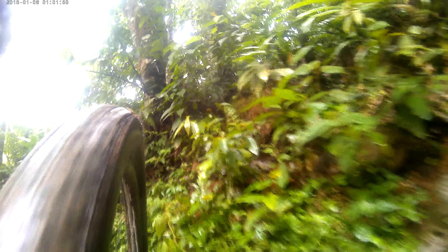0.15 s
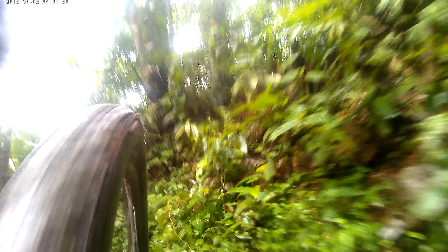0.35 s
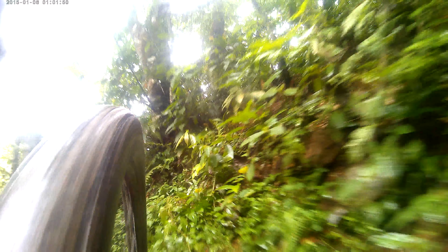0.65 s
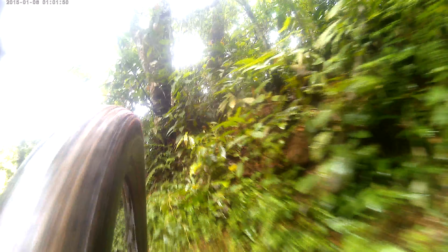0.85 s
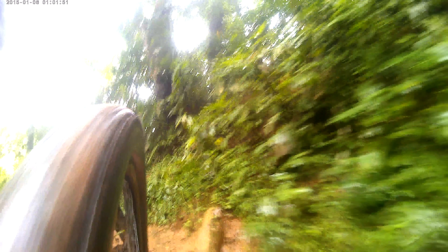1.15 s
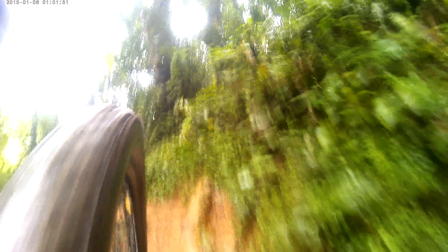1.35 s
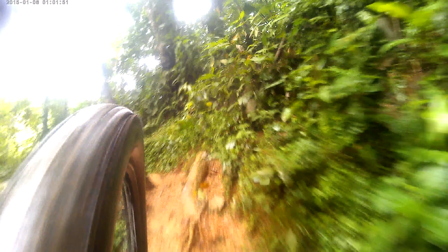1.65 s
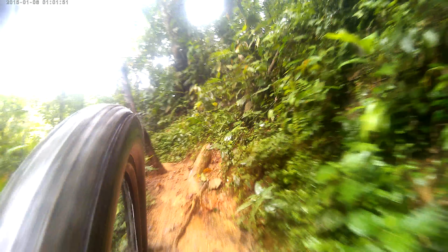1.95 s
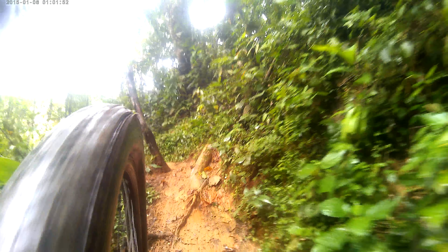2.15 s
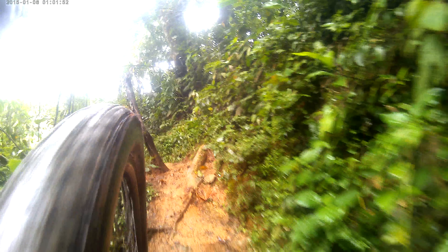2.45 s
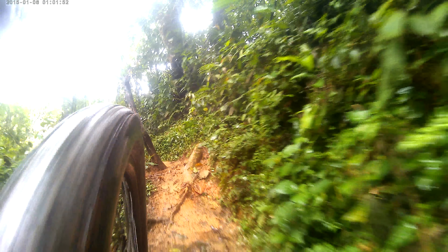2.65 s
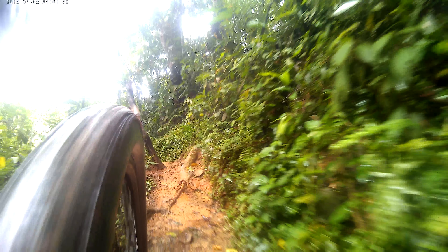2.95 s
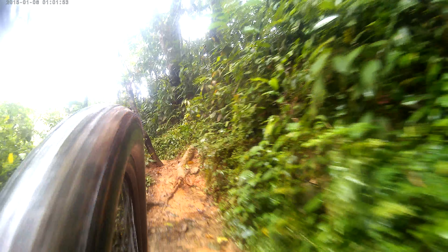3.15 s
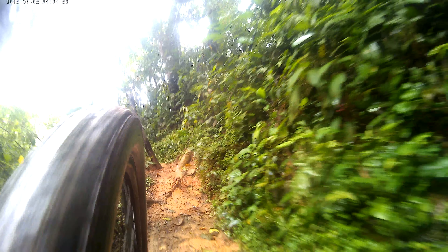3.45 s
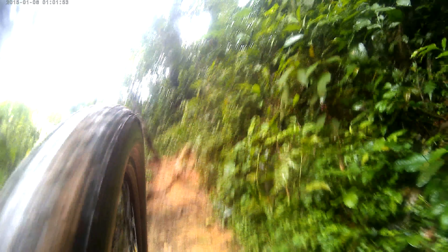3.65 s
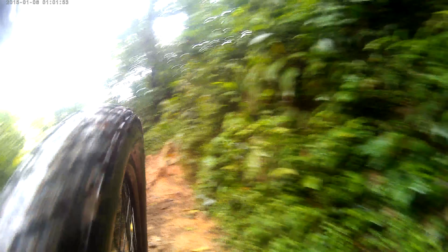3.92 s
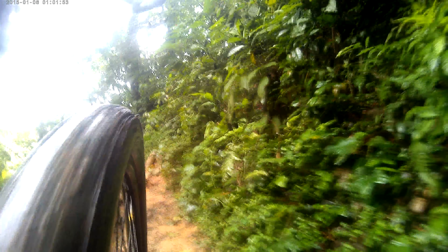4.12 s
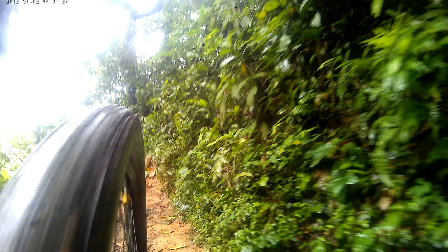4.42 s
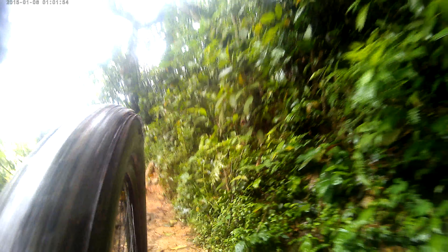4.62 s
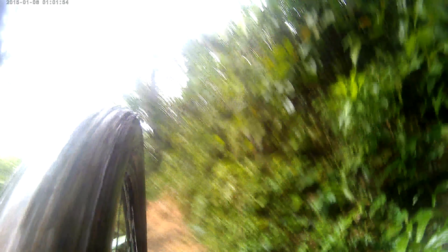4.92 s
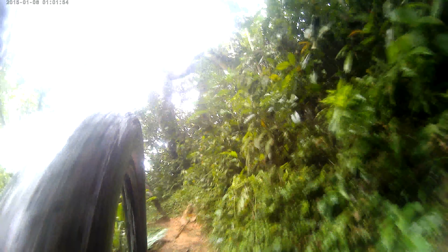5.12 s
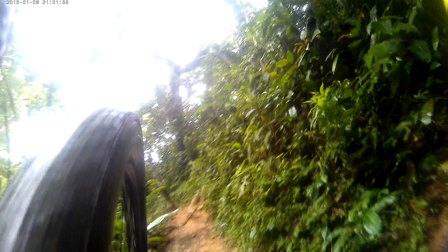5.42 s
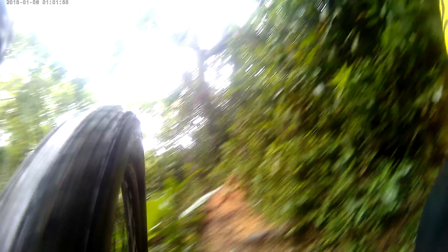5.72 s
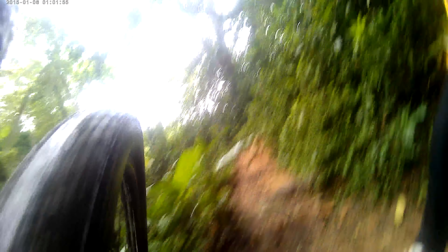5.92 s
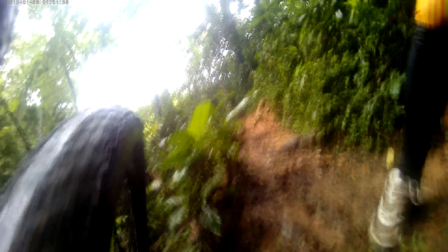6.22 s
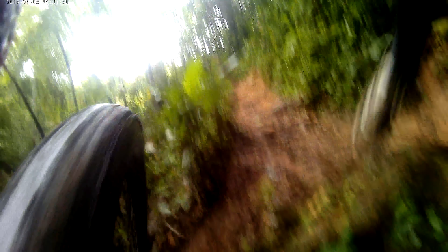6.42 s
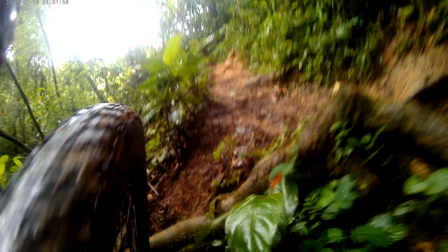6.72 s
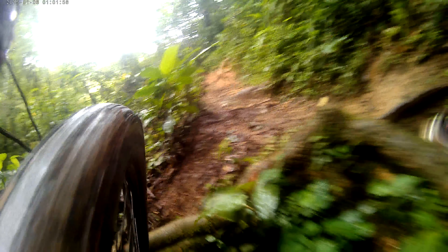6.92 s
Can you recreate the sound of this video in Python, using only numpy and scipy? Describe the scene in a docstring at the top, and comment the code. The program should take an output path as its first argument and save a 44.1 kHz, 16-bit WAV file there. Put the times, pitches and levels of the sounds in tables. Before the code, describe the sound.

A bicycle shakes along a muddy forest trail, captured through its plastic housing at no distance. Dull trembling and hollow ticks run unevenly, with a stronger rattle before a short drag and a calmer moment. Two hard bump clusters bring clattering blows and a low, fading tyre boom; the last second has heavy, clipped knocks, then eases. Treble is missing and there is no room echo.

```python
"""A mountain bike on a rough mud trail, from a microphone sealed in a plastic housing clamped to the frame.
From the start the trail shakes housing and mount through filtered noise and jolts, small parts rattle, a panel
whirrs, and loose parts tick and knock at no distance. At 2.4 s something drags along the housing. Near 3.15 s and
5.8 s come hard patches with hammering blows of the clamp and a decaying sine boom from the tyre. More rough
patches and heavy knocks follow to the end; the hardest blows overload the narrow-band capture."""
import sys
import numpy as np
from scipy import signal
from scipy.io import wavfile
from scipy.ndimage import uniform_filter1d

SR = 44100
rng = np.random.default_rng(int(sys.argv[2]) if len(sys.argv) > 2 else 0)


def wav_out(sig):
    """Save sig, one row per channel (or a flat mono array), as 16-bit PCM at SR to the path in sys.argv[1]."""
    wavfile.write(sys.argv[1], SR, np.round(np.clip(np.atleast_2d(sig).T, -1, 1) * 32767).astype(np.int16))


N = 311787

# even stretches of the trail, joined by straight lines: start_s, shaking_db (housing), heave_db (mount, above shaking)
TRAIL_STRETCHES = [(0, -36.5, 5.5), (0.41, -41, 5.5), (0.8, -38, -0.5), (1.3, -42.5, -1), (1.55, -38.5, -5),
                   (1.74, -25.5, -1), (1.9, -27, 6.5), (2.33, -36, -11), (2.6, -33, -20), (3.1, -38, -8.5),
                   (3.65, -36.5, -16.5), (4.0, -37.5, -1), (4.87, -42.5, -0.5), (5.18, -52, -1.5),
                   (5.35, -39, 3), (6.28, -36.5, -13.5), (7.07, -44.5, 5)]
# rough patches under the wheel: start_s, length_s, shaking_db, heave_db (above shaking)
ROUGH_PATCHES = [(0.888, 0.072, -23, 3), (1.586, 0.04, -23, -10), (1.905, 0.011, -19, 12),
                 (3.119, 0.015, -23.5, -7.5), (3.15, 0.058, -5, -5.5), (3.274, 0.074, -19, -6.5),
                 (4.042, 0.13, -20.5, 3.5), (4.247, 0.032, -13.5, -5), (4.434, 0.025, -25, -6),
                 (4.463, 0.11, -17, -7.5), (4.612, 0.12, -25.5, 1), (5.386, 0.032, -25.5, 8.5),
                 (5.443, 0.17, -17.5, -6), (5.568, 0.12, -14.5, -5), (5.723, 0.028, -5.5, -15),
                 (5.773, 0.022, -8, -15.5), (5.828, 0.027, -4.5, -13), (5.964, 0.048, -22.5, -6.5),
                 (6.374, 0.088, -27, 3), (6.563, 0.096, -12, -10.5), (6.708, 0.016, -20, -9),
                 (6.749, 0.0072, -9.5, 2), (6.802, 0.026, -16.5, -6), (6.912, 0.013, -11.5, -6),
                 (7.046, 0.03, -19.5, -1)]
# each patch builds up before its start, holds, drops away fast, and leaves the frame to settle
BUILD_DB_PER_S, DROP_DB_PER_S, SETTLE_DB, SETTLE_DB_PER_S = 2002, 397.5, -15.5, 75
# modes of the housing walls: pitch_hz, width_hz, level_db
WALL_MODES = [(309.3, 87.4, 3.5), (363.6, 77, 1), (429.3, 97.5, -0.5), (506, 81, -6), (602, 64, -5.5),
              (758.3, 69, -6), (908, 62.4, -9), (984, 65, -14)]
# modes of the small stiff parts of the housing: pitch_hz, width_hz, level_db
PART_MODES = [(1520, 410, -4), (1449, 71, -0.5), (1540, 133, 8), (1748, 530, -1), (2000, 44, 0),
              (2250, 160, -14), (2767, 130, -14.5), (3108, 120, -8), (3600, 330, -23)]
# modes of the mount on the frame: pitch_hz, width_hz, level_db
MOUNT_MODES = [(27, 43, -6), (78, 30, -3), (133, 45, -4)]
# modes of the flexing clamp: pitch_hz, width_hz, level_db
CLAMP_MODES = [(159, 44.6, 0.5), (268, 185, 2)]
# loose parts striking the housing: start_s, tick_db, knock_db (above the tick), knock_pitch_hz
LOOSE_STRIKES = [(0.103, -27, 1.5, 296), (0.198, -31.5, 12, 370), (0.2301, -32, 4, 353),
                 (0.392, -29, 4.5, 243), (0.4909, -29.5, 15.5, 377), (0.586, -29, 3, 403),
                 (0.7058, -31.5, -11, 332), (0.7425, -31, 10, 364), (0.8838, -43, 33.5, 371),
                 (0.9175, -27, 21.5, 800), (0.934, -24.5, -7, 400), (0.946, -32, 21, 300),
                 (1.0622, -26, -17, 358), (1.1139, -29, 10, 412), (1.192, -29, -17, 396),
                 (1.268, -32, 15, 400), (1.395, -32.5, 17.5, 405), (1.5051, -31, 8, 413),
                 (1.597, -29.5, 6, 334), (1.6068, -29, 11.5, 600), (1.664, -30, -8, 400),
                 (1.705, -28.5, -1, 400), (1.726, -32, 19, 296), (1.8115, -28.5, 15, 293),
                 (1.8575, -30, 14.5, 603), (1.874, -24, 3, 400), (1.908, -18.5, 20.5, 253),
                 (1.921, -15.5, 8.5, 800), (2.2152, -31.5, 3.5, 360), (2.3329, -30, 3, 440),
                 (2.6574, -33, 8, 365), (2.9303, -34.5, 10, 717), (3.148, -18.5, 15, 308),
                 (3.159, -13, -0.5, 400), (3.184, -5.5, 6, 810), (3.197, -7.5, -1.5, 350),
                 (3.448, -29.5, -11, 342), (3.4864, -22.5, 8, 497), (3.6097, -31.5, 11.5, 396),
                 (3.6875, -41.5, 26, 480), (3.7743, -28, 4.5, 400), (3.962, -29, 5, 339),
                 (4.0429, -34.5, 26, 377), (4.087, -25.5, 17.5, 402), (4.147, -38, 3, 400),
                 (4.1755, -27.5, 21, 563), (4.252, -23.5, 22, 624), (4.4637, -32.5, 19, 500),
                 (4.501, -28.5, 21.5, 258), (4.633, -30, 1, 590), (4.6466, -35.5, 29.5, 350),
                 (5.0081, -33.5, 6.5, 712), (5.3114, -32.5, 6.5, 334), (5.381, -41, 18.5, 510),
                 (5.436, -38, 25.5, 600), (5.4907, -32.5, 22, 689), (5.5665, -14, 18, 300),
                 (5.7187, -29, 21, 343), (5.864, -7.5, 5, 493), (5.966, -40.5, 31.5, 390),
                 (6.108, -31.5, 4, 355), (6.2794, -29.5, -23, 338), (6.444, -26, 5.5, 310),
                 (6.536, -27.5, 4, 239), (6.5604, -17, -10, 420), (6.6439, -30, 2, 427),
                 (6.7043, -21, 7, 337), (6.7525, -1, 8, 506), (6.876, -19.5, -1, 384),
                 (6.911, -19.5, 23.5, 297), (7.0513, -25, 11, 552)]
# the wheel meeting roots and stones: start_s, level_db, heave_pitch_hz
WHEEL_BUMPS = [(0.383, -7, 26.6), (0.871, -6, 27.8), (1.653, 1.5, 60), (3.143, -5.5, 128), (4.034, -1, 80),
               (5.513, -0.5, 27.4), (5.817, -12.5, 142), (6.542, 2, 140), (6.722, 3, 159)]
# landings that leave the air in the tyre booming: start_s, level_db (before onset and wobble)
TYRE_BOOMS = [(3.163, -6.5), (5.822, -3)]
TYRE_HZ, TYRE_T60_S = 127.2, 0.6  # air mode of the tyre
# the clamp hammering against its stop: start_s, length_s, walls_db, parts_db (small parts, above the walls)
CLAMP_HAMMERING = [(3.152, 0.048, -15.5, -13.5), (4.083, 0.057, -32, -8.5), (4.494, 0.058, -35.5, -22),
                   (5.768, 0.017, -18.5, -13.5), (5.83, 0.039, -13, -18)]
SCRAPE_S, SCRAPE_DB, SCRAPE_FADE_DB_PER_S = 2.401, -12, 249  # something drags along the housing
# modes the drag sets ringing: pitch_hz, width_hz (of each of two passes), level_db
DRAG_MODES = [(304, 22.5, -1), (758, 140, -10), (1590, 110, -5.5), (2970, 660, -20)]
# the rolling wheel: start_s, rattle_db (small parts), whirr_db (one panel), whirr_pitch_hz
WHEEL_ROLLING = [(0, -50.5, -32, 354), (.7, -45, -42, 374), (1.3, -50.5, -33, 390),
                 (1.7, -49.5, -36, 391.5), (2.9, -47.5, -74.5, 331), (3.4, -48.5, -27.5, 378),
                 (3.9, -59, -45, 399), (4.5, -51, -26.5, 344), (5.2, -60, -52.5, 360),
                 (5.7, -47.5, -31, 331), (6.25, -53, -33.5, 336), (6.75, -32.5, -38, 375),
                 (7.07, -79, -46, 350)]
BAND_HZ, EDGE_HZ = 4230, 19700  # band limits of the capture, before and after the flat cut


def ride():
    """The rough trail shakes walls and mount, more weakly the small parts, and flexes the clamp."""
    shake_db, heave_db, contact_db = roughness()
    shared = jolts(per_s=300, spread_db=5.5, hum=0.93)
    mount_force = soft(jolts(per_s=60, spread_db=-2.5, hum=0.91), 240.0)
    mount = trembling(mount_force, MOUNT_MODES, patchy_db=9.0)
    parts = trembling(soft(shared, 2500.0), PART_MODES[:6], patchy_db=4.0)
    walls = soft(trembling(soft(shared, 1100.0), WALL_MODES, patchy_db=4.5), 1400.0)
    clamp = trembling(soft(shared, 750.0), CLAMP_MODES, patchy_db=0.0)

    thud = jolts(per_s=150, spread_db=3.0, hum=0.9)  # reaches the housing through the tubes without ringing
    for hz in (598.0, 900.0, 1100.0):
        thud = soft(thud, hz)
    frame = steady(thud, 0.09)

    flex_db = np.minimum(0.2 * shake_db + 0.5, -3.0)  # the clamp gives more under hard shaking
    lumps_db = 2.98 * wander(35)  # stones and ruts come unevenly
    shaken = walls + gain_of(heave_db) * mount + gain_of(flex_db) * clamp
    shaken += gain_of(contact_db - shake_db - 23.5) * parts + gain_of(-5.5) * frame
    return gain_of(shake_db + lumps_db) * shaken


def roughness():
    """Trail and patches add as powers: shaking dB, heave dB above it, and contact dB, which does not settle."""
    shake_db, heave_db = curves(TRAIL_STRETCHES)
    power = gain_of(2 * np.array([shake_db, shake_db + heave_db, shake_db]))
    t = np.arange(N) / SR
    for s, length, db, above_db in ROUGH_PATCHES:
        early, late = np.maximum(s - t, 0), np.maximum(t - s - length, 0)
        drop_db = -DROP_DB_PER_S * late
        fall_db = np.maximum(drop_db, SETTLE_DB - SETTLE_DB_PER_S * late)
        levels_db = np.array([db + fall_db, db + above_db + fall_db, db + drop_db])
        power += gain_of(2 * (levels_db - BUILD_DB_PER_S * early))
    shake_db, mount_db, contact_db = 10 * np.log10(power)
    return shake_db, mount_db - shake_db, contact_db


def strikes():
    """Each strike rings the small parts briefly and one wall panel a little longer, in a new balance of modes."""
    out = np.zeros(N)
    for s, tick_db, knock_db, hz in LOOSE_STRIKES:
        force = burst(0.0062)
        tick = body(force, PART_MODES, 2.5 * rng.standard_normal(len(PART_MODES)))
        click = gain_of(-15.5) * ring(force, 3000, 1100)  # the bare contact
        tick = tick / abs(tick).max() + click

        width = 46.0 + 280.0 * min(gain_of(tick_db + knock_db), 1)  # hard knocks press the panel and damp it
        push = force * (np.arange(len(force)) < SR // 500)  # the first 2 ms
        panel = ring(ring(push, hz, width), hz, width)  # two passes: swells for a few cycles, then fades
        walls = body(force, WALL_MODES, 5.4 * rng.standard_normal(len(WALL_MODES)))
        knock = soft(panel + 0.23 * walls, 2700.0)
        knock -= soft(knock, 110.0)  # the knock keeps little below about 110 Hz, so it does not thump

        strike = tick / abs(tick).max() + gain_of(knock_db) * knock / abs(knock).max()
        add(out, s, gain_of(tick_db) * strike)
    return out


def burst(decay_s):
    """The contact force of one strike: a sharp first touch, then chatter that dies away."""
    t = np.arange(SR // 10) / SR
    force = rng.standard_normal(len(t)) * np.exp(-t / decay_s)
    force[0] = 12.3
    return force


def bumps():
    """A bump throws the mount through a heavily damped cycle or so; two landings make the tyre boom."""
    out, t = np.zeros(N), np.arange(SR) / SR
    for s, db, hz in WHEEL_BUMPS:
        heave = np.sin(2 * np.pi * hz * t) * np.exp(-hz * t / 0.22)
        add(out, s, gain_of(db) * heave)

    wobble = 0.5 * np.sin(2 * np.pi * 13.0 * t)  # the turning wheel rocks the mode in phase and level
    fade = gain_of(-60 * t / TYRE_T60_S)
    onset = 1 - np.exp(-t / 0.0059)
    boom = np.sin(2 * np.pi * TYRE_HZ * t + wobble) * (1 + wobble) * fade * onset
    for s, db in TYRE_BOOMS:
        add(out, s, gain_of(db) * boom)
    return out


def hammering():
    """The clamp hits its stop in a dense volley of blows that starts at once, holds, and rings out."""
    out, t = np.zeros(N), np.arange(SR // 5) / SR
    for s, length, walls_db, parts_db in CLAMP_HAMMERING:
        volley = np.exp(-np.maximum(t - length, 0) / 0.0067)
        size = gain_of(5.5 * np.minimum(rng.exponential(1, len(t)), 4))
        blows = size * (rng.random(len(t)) < 400 / SR)  # 400 a second on average
        force = rng.standard_normal(len(t)) * (0.57 + blows) * volley
        walls = body(force, WALL_MODES, 2.0 * rng.standard_normal(len(WALL_MODES)))
        parts = body(force, PART_MODES[:6], 2.0 * rng.standard_normal(6))
        held = np.sqrt(len(t) / (volley ** 2).sum())  # refers the rms to the volley alone
        add(out, s, gain_of(walls_db) * held * (evened(walls) + gain_of(parts_db) * evened(parts)))
    return out


def scrape():
    """A short drag bites in and fades while its noise force keeps a few modes singing."""
    out, t = np.zeros(N), np.arange(SR // 5) / SR
    force = rng.standard_normal(len(t))
    sing = np.zeros(len(t))
    for hz, width, db in DRAG_MODES:
        mode = ring(ring(force, hz, width), hz, width)
        sing += gain_of(db) * steady(mode, 0.029)
    bite = np.minimum(t / 0.0096, 1)
    fade = gain_of(SCRAPE_DB - SCRAPE_FADE_DB_PER_S * t)
    add(out, SCRAPE_S, fade * bite * sing[::-1])  # the ringing runs backwards in time
    return out


def rolling():
    """Tread and mud keep the small parts rattling and one panel whirring at a pitch that wavers."""
    rattle_db, whirr_db, hz = curves(WHEEL_ROLLING)
    parts = trembling(jolts(per_s=79, spread_db=3.5, hum=1.2), PART_MODES, patchy_db=5.0)

    # a resonance of moving pitch: shift the force down to 0 Hz, smooth it, shift it back
    turn = np.exp(2j * np.pi * np.cumsum(hz + 12.0 * wander(15)) / SR)
    keep = np.exp(-np.pi * 42.0 / SR)  # each of two poles is 42 Hz wide
    force = jolts(per_s=13, spread_db=1.0, hum=0.88)
    whirr = (turn * signal.lfilter([1], [1, -2 * keep, keep ** 2], force / turn)).real

    clumps_db = 1.6 * wander(5.4)  # mud comes in lumps
    return gain_of(clumps_db) * (gain_of(rattle_db) * parts + gain_of(whirr_db) * steady(whirr, 0.58))


def trembling(force, modes, patchy_db):
    """Modes under a lasting force whose point of contact keeps moving, so the colour drifts."""
    weights_db = [patchy_db * wander(14) for mode in modes]
    return steady(body(force, modes, weights_db), 0.15)


def body(x, modes, weights_db):
    """A sum of modes, neighbours of opposite sign, each excited more or less strongly."""
    out = 0
    for k, (hz, width, db) in enumerate(modes):
        out = out + (-1) ** k * gain_of(db + weights_db[k]) * ring(x, hz, width)
    return out


def ring(x, hz, width):
    """One damped mode, a pole pair with a gain of about 1 at its centre."""
    pole = np.exp((2j * np.pi * hz - np.pi * abs(width)) / SR)
    return 2 * (1 - abs(pole)) * signal.lfilter([1], [1, -pole], x).imag


def jolts(per_s, spread_db, hum):
    """Random impacts, a few much larger (smaller if the spread is negative), over an even noise tremble."""
    size = gain_of(spread_db * np.minimum(rng.exponential(1, N), 4)) * rng.choice([-1., 1.], N)
    impacts = size * (rng.random(N) < per_s / SR)
    return evened(impacts) + hum * rng.standard_normal(N)


def soft(x, hz):
    """Rubber and plastic round off the contact: little force is left above hz."""
    return signal.lfilter(*signal.butter(2, hz, fs=SR), x)


def steady(x, window_s):
    """Divides out slow drift so that the level is set elsewhere."""
    return x / np.sqrt(uniform_filter1d(x ** 2, int(window_s * SR)) + 1e-12)


def wander(per_s):
    """A slow random curve of rms 1, through per_s chance points a second."""
    points = rng.standard_normal(int(N / SR * per_s) + 2)
    return evened(np.interp(np.arange(N) / SR * per_s, np.arange(len(points)), points))


def curves(rows):
    """Table columns as curves over time."""
    s, *columns = np.transpose(rows)
    return [np.interp(np.arange(N) / SR, s, c) for c in columns]


def gain_of(db):
    """Level in dB to amplitude."""
    return 10 ** (np.asarray(db) / 20)


def evened(x):
    """Scales to rms 1."""
    return x / np.sqrt(np.mean(x ** 2) + 1e-20)


def add(mix, s, sound):
    """Mixes a sound in at time s."""
    part = mix[round(s * SR):][:len(sound)]
    part += sound[:len(part)]


def low_pass(x, hz):
    """Steep band limit."""
    taps = signal.firwin(401, hz, window=("kaiser", 10), fs=SR)
    return signal.oaconvolve(x, taps[None], "same")


def scene():
    """Everything reaches one microphone through the housing."""
    return (ride() + rolling() + strikes() + hammering() + scrape() + bumps())[None]


def record(dry):
    """The microphone amplifier saturates; after the narrow-band capture, peaks past full scale are cut flat."""
    coupled = signal.lfilter(*signal.butter(1, 14.0, "high", fs=SR), dry)
    ceiling, knee = 1.01, 7  # a high knee bends late and sharply
    saturated = coupled / (1 + abs(coupled / ceiling) ** knee) ** (1 / knee)
    cut = np.clip(low_pass(saturated, BAND_HZ), -1, 1)
    return low_pass(cut, EDGE_HZ)


dry = scene()
out = record(dry)
wav_out(out)
```